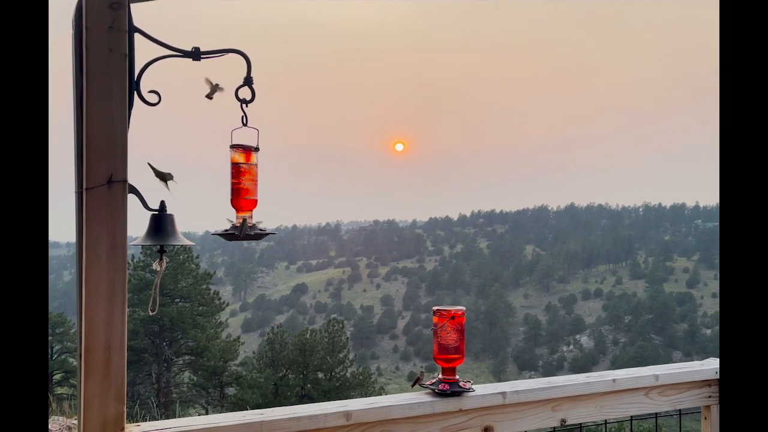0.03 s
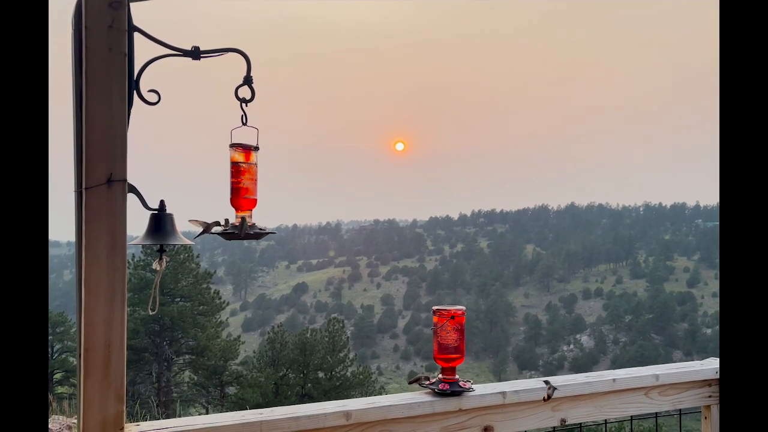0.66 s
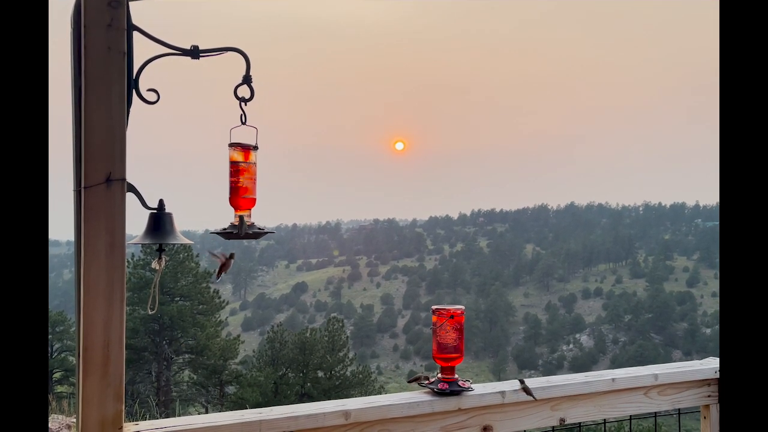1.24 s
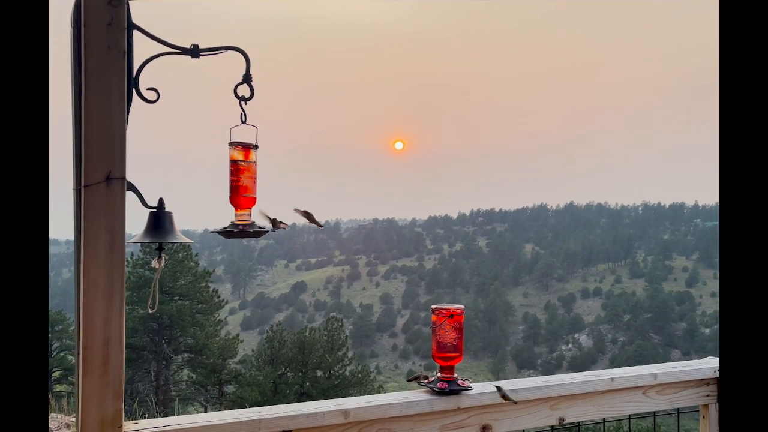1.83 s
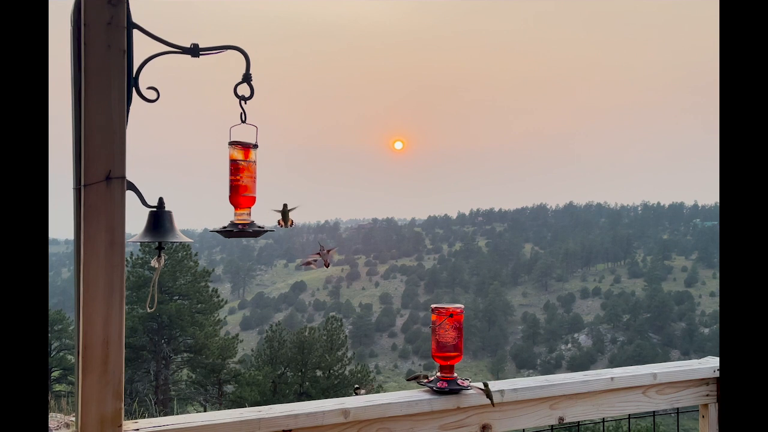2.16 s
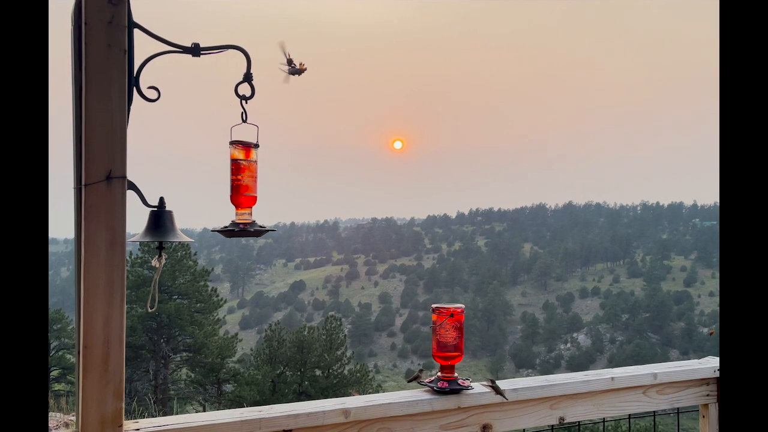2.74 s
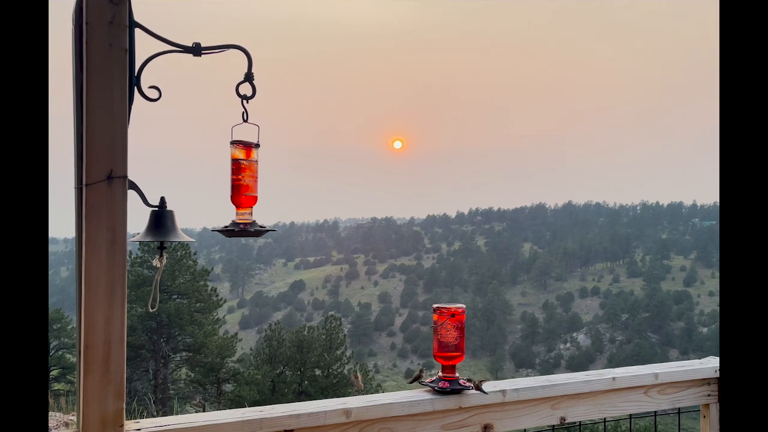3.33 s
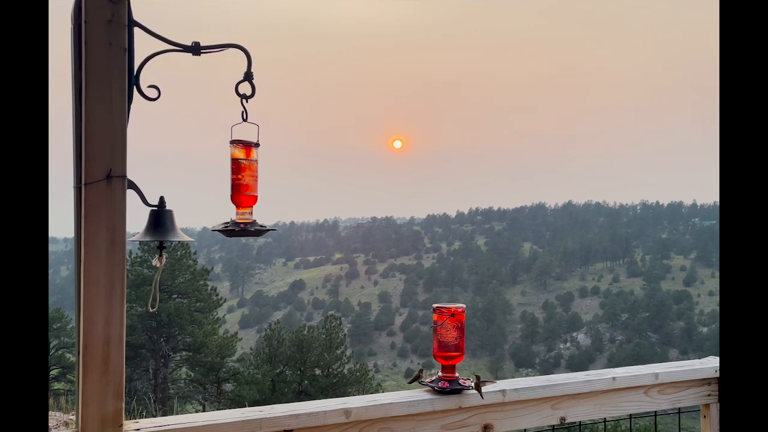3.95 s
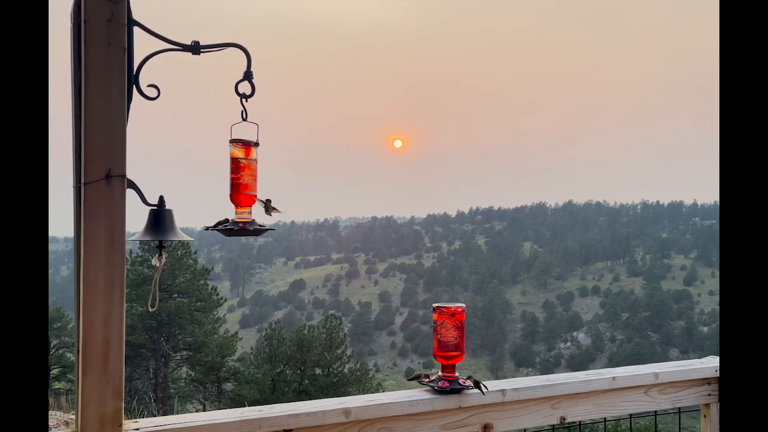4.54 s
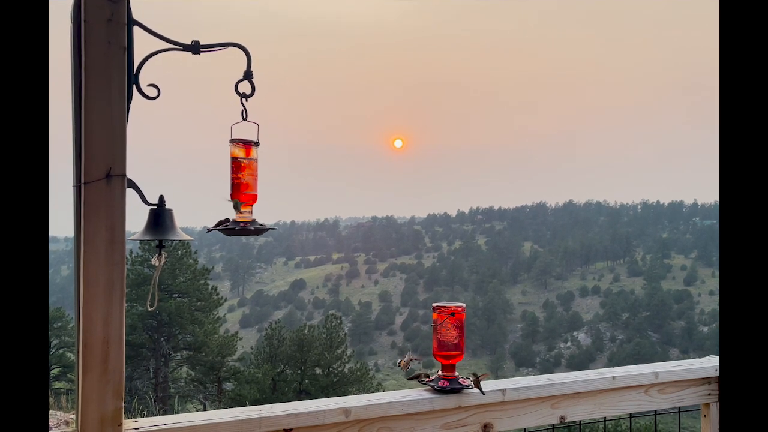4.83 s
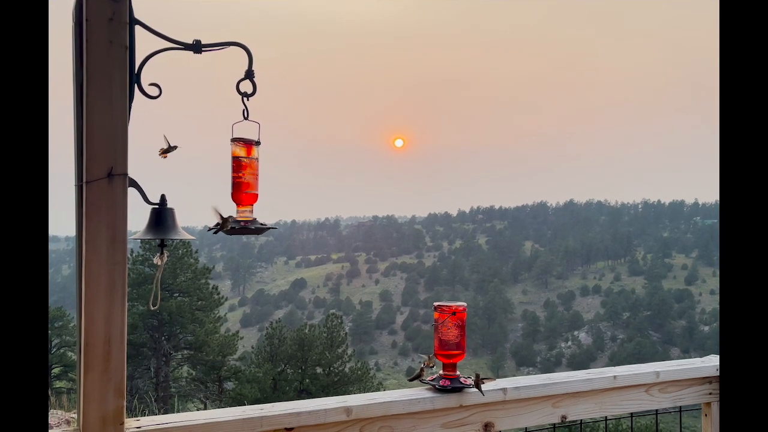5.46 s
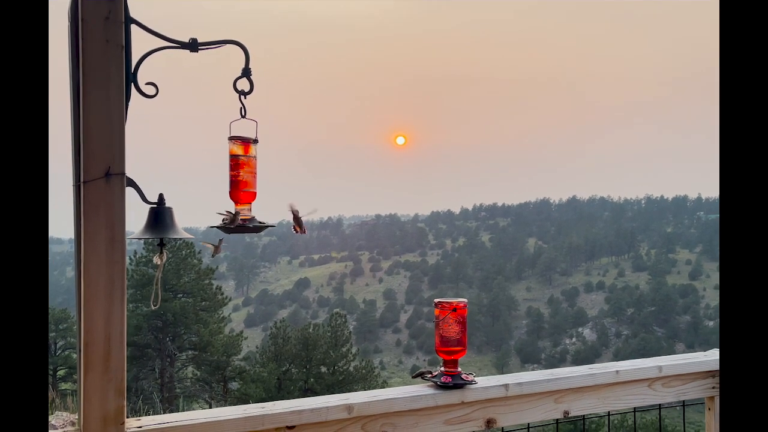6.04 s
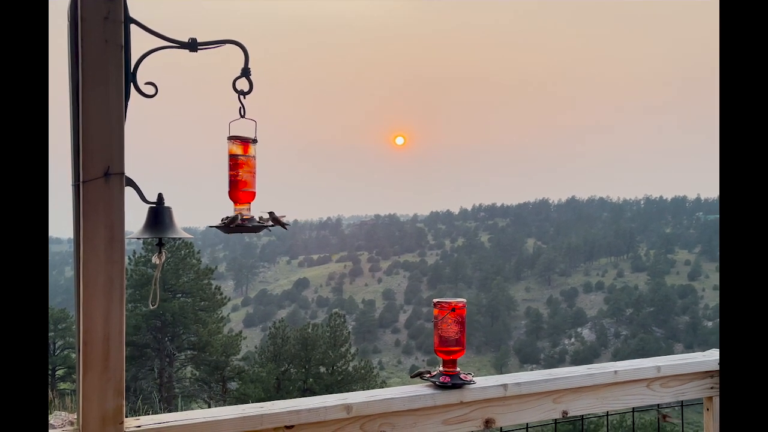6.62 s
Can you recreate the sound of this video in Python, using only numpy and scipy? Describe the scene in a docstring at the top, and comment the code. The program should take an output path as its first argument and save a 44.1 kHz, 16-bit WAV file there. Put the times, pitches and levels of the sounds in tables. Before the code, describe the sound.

Hummingbirds chip, tick and squeal outdoors, their wings humming and whirring past over a low steady rumble.

```python
"""Wings hum over a low rumble and a soft outdoor hiss: hummingbirds are squabbling round two feeders
on a wooden deck. Each wingbeat pushes the air, and now and then the outer feathers whistle. The birds'
syrinxes sweep out steep ticks, chips, one long trill, down-slurred squeals and rasps, among a few knocks.
The deck throws back short echoes; a small two-port microphone hears it all."""
import sys
import numpy as np
from scipy import signal
from scipy.fft import rfft, irfft, next_fast_len
from scipy.io import wavfile

SR = 44100
rng = np.random.default_rng(int(sys.argv[2]) if len(sys.argv) > 2 else 0)


def waveform_to_disk(signal):
    """Save audio, clipped to [-1, 1], as 16-bit WAV at the path in sys.argv[1]."""
    frames = np.transpose(np.atleast_2d(signal))
    scaled = np.clip(frames, -1, 1) * 32767
    samples = np.round(scaled).astype(np.int16)
    wavfile.write(sys.argv[1], SR, samples)


N = 295029
TIME = np.arange(N) / SR


def amp(db):
    return 10 ** (np.asarray(db) / 20)


def unit(x):
    return x / np.sqrt(np.mean(x ** 2) + 1e-20)


def at_hz(points, hz):
    """Interpolation on a log-frequency axis."""
    f, value = np.transpose(points)
    return np.interp(np.log(hz + 1), np.log(f + 1), value)


def at_time(rows):
    return np.interp(TIME, *np.transpose(rows))


def add(mix, start_s, sound):
    """Superposition: a sound sums into the stereo mix."""
    part = mix[:, max(round(start_s * SR), 0):][:, :sound.shape[1]]
    part += sound[:, :part.shape[1]]


def colour(x, points):
    """Filtering: each frequency is scaled by its own gain."""
    size = next_fast_len(x.shape[-1])
    gain = amp(at_hz(points, np.fft.rfftfreq(size, 1 / SR)))
    return irfft(rfft(x, size) * gain, size)[..., :x.shape[-1]]


def wander(rate_hz, size=N):
    """Low-pass noise: a smooth random fluctuation of unit size."""
    full = next_fast_len(size)
    f = np.fft.rfftfreq(full, 1 / SR)
    spectrum = rfft(rng.standard_normal(full)) * np.exp(-(f / rate_hz) ** 2) * (f > 0)
    return unit(irfft(spectrum, full))[:size]


def air(points, spread):
    """Partly coherent noise: spread scales the part that differs between the ports."""
    mid, side = colour(rng.standard_normal((2, N)), points)
    return unit(mid) + spread * unit(side) * np.array([[1], [-1]])


# Harmonics of a fast and a slow wingbeat. Each row: multiple of the beat rate, level in dB.
FAST_HARMONICS = [(1, -2), (2, -1), (3, -10.5), (4, -14.5), (5, -29), (6, -22.5)]
SLOW_HARMONICS = [(1, -9.5), (2, -0.5), (3, -15), (4, -9), (5, -22), (6, -28), (7, -21), (8, -19.5)]
FAST_BEAT_HZ, SLOW_BEAT_HZ = 80.8, 52.1
def wing_hum(beat_hz, harmonics, waver=0.01248, unsteady_db=2):
    """Periodic pushes on the air make a harmonic series; its partials swell and fade as the bird turns."""
    size = len(beat_hz)
    phase = 2 * np.pi * np.cumsum(beat_hz * (1 + waver * wander(12.18, size))) / SR
    return sum(amp(db + unsteady_db * wander(9.8, size)) * np.sin(k * phase + 2 * np.pi * rng.random())
               for k, db in harmonics)


# Air stirred by all the wings. Each row: time in seconds, level in dB.
STIR = [(0.03, -61), (1.6, -60.5), (1.81, -56), (2.25, -61), (2.46, -52), (2.66, -57.5), (3.29, -57.5),
        (3.61, -70), (3.68, -61.5), (4.15, -61.5), (4.26, -69.5), (5.02, -60), (5.56, -63), (5.69, -71.5),
        (6.26, -63), (6.69, -73)]
USUAL_STIR_DB = -60
def hovering(beat_hz, harmonics, level_db, follow, drift=.025, sway_db=2.0):
    """A stationary source: the hum of a bird at a feeder sways and grows with the bustle."""
    bustle_db = follow * (at_time(STIR) - USUAL_STIR_DB) + sway_db * wander(3.4)
    return amp(level_db + bustle_db) * wing_hum(beat_hz * (1 + drift * wander(1.49)), harmonics)


# Spectra of rumble, wing wash and hiss. Each row: frequency in Hz, relative density in dB.
RUMBLE = [(15, -52), (28, -24), (38, -10), (50, 9.5), (70, 1), (120, -7), (250, -10.5), (600, -43),
          (2000, -94)]
WASH = [(20, -28), (40, -9), (90, 9.5), (200, 6), (300, 2), (420, -0.5), (600, -7.5), (900, -18),
        (1600, -19), (3000, -29.5), (8000, -35), (11500, -67), (12600, -74)]
HISS = [(300, -10), (1000, 3.5), (2500, 1.5), (4500, -7), (6500, -1), (9000, 5), (11000, 9.5),
        (12100, -5.5), (12600, -34)]
# Swell of the hiss. Each row: time in seconds, level in dB.
HISS_LEVEL = [(0, -70), (1, -69), (1.7, -73), (2.08, -63), (2.75, -68.5), (3.3, -72.5), (4.6, -76.5),
              (5.6, -73.5), (6.05, -82.5), (6.69, -85)]
def air_noise(rumble_db=-59.0, rumble_follow=0.38, wash_db=-62.0, wash_follow=1.19):
    """Amplitude-modulated noise: rumble and the rush off the wings follow the stir, under a fine hiss."""
    stir_db = at_time(STIR) - USUAL_STIR_DB
    rumble = amp(rumble_db + rumble_follow * stir_db + 1.15 * wander(7.4)) * air(RUMBLE, spread=0.027)
    flicker_db = 1.76 * wander(90) + 2.47 * wander(5.9)
    wash = amp(wash_db + wash_follow * stir_db + flicker_db) * air(WASH, spread=0.41)
    hiss = amp(at_time(HISS_LEVEL) + 2.7 * wander(80)) * air(HISS, spread=0.36)
    return rumble + wash + hiss


# Birds darting past. Each row: time when nearest in seconds, time to close in in seconds,
# wingbeat rate in Hz, hum level in dB.
PASSES = [(0.051, 0.056, 43, -50), (0.3, 0.17, 84, -57), (0.719, 0.22, 82.4, -57), (1.14, 0.041, 85, -52.5),
          (1.799, 0.24, 87, -57), (1.84, 0.1, 56, -50), (2.2, 0.19, 75.6, -55), (2.35, 0.047, 48, -48),
          (2.55, 0.1, 50.4, -47), (2.79, 0.055, 50, -51.5), (3.12, .18, 51, -51.5), (4.031, .09, 79, -57.5),
          (4.26, 0.14, 44, -54.5), (4.979, 0.1, 75, -60), (5.55, 0.076, 77, -57.5), (6.27, 0.17, 52, -56)]
FLIGHT_M_PER_S, SOUND_M_PER_S = 2.948, 343
def passes():
    """Doppler effect: a passing hum drops in pitch, and its amplitude falls with distance squared."""
    out = np.zeros((2, N + SR))
    t = np.arange(2 * SR) / SR - 1
    for nearest_s, closing_s, beat_hz, level_db in PASSES:
        distance = np.hypot(1, t / closing_s)  # in units of the nearest distance
        doppler = 1 - FLIGHT_M_PER_S / SOUND_M_PER_S * t / closing_s / distance
        harmonics = FAST_HARMONICS if beat_hz > (FAST_BEAT_HZ + SLOW_BEAT_HZ) / 2 else SLOW_HARMONICS
        envelope = amp(level_db) / distance ** 2 * signal.windows.tukey(len(t), .5)
        add(out, nearest_s, envelope * wing_hum(beat_hz * doppler, harmonics)[None])
    return out[:, SR:]  # each pass begins a second before it is nearest


def with_echoes(sound, echo_db, early=0.25, spread_s=.014, tail=0.88, t60_s=0.12, port_lag_s=.00008):
    """Reflection: post, rail and boards add a few early echoes and a short diffuse tail."""
    t = np.arange(SR // 4) / SR
    delay, strength, side = rng.random((3, 7))
    taps = np.zeros((2, len(t)))
    for port, sign in enumerate((1, -1)):  # each echo arrives from its own side
        arrival_s = .002 + spread_s * delay + sign * port_lag_s * (side - .5)
        taps[port, (arrival_s * SR).astype(int)] = strength + .5
    envelope = amp(-60 * t / t60_s) * np.minimum(t / 0.0035, 1)
    shared, left, right = rng.standard_normal((3, len(t))) * envelope
    diffuse = shared + .5 * np.array([left, right])
    response = early * taps / np.linalg.norm(taps[0]) + tail * diffuse / np.linalg.norm(diffuse[0])
    heard = amp(echo_db) * signal.fftconvolve(sound[None], response, axes=1)
    heard[:, :len(sound)] += sound
    return heard


# Response of the throat. Each row: frequency in Hz, gain in dB.
THROAT = [(1500, -0.5), (2100, -4.5), (2700, -7), (3500, -6), (5000, -1), (7000, 5.5), (8500, 8),
          (11000, 12), (13000, -14)]
ATTACK_S, RELEASE_S = 0.00062, 0.00043
NEAR_CALL_DB, ECHO_DB_PER_DB = -54.5, 0.1928  # a fainter call is farther off and has more echo
def syrinx(rows, contour, echo_db, rough, scratch, shake_db=2.5, waver=0.012, flutter_hz=900,
           warble=0., warble_hz=98, settle=0., throb=0., throb_hz=95):
    """Source and filter: the syrinx sweeps a harmonic tone along a contour and the throat colours it."""
    out = np.zeros((2, N))
    share, contour_hz, contour_db = np.transpose(contour)
    for start_s, length, pitch, level_db, tilt_db in rows:
        t = np.arange(int(length * SR)) / SR
        progress = t / length
        flutter, drift, shake, grit = (wander(r, 12288)[:len(t)] for r in (flutter_hz, 200, 300, 1800))
        swing = np.tanh(-2 * np.cos(2 * np.pi * warble_hz * t)) * (1 - settle * progress)
        bend = np.exp(rough * flutter + waver * drift + warble * swing)
        hz = pitch * np.interp(progress, share, contour_hz) * bend
        phase = 2 * np.pi * np.cumsum(hz) / SR
        voice = sum(amp(at_hz(THROAT, k * hz) + tilt_db * np.log2(k)) * np.sin(k * phase)
                    * np.clip((SR / 3 - k * hz) / 2000, 0, 1) for k in range(1, 8))
        effort = amp(np.interp(progress, share, contour_db) + shake_db * shake)
        effort *= 1 + scratch * grit  # uneven cycles scratch
        pulsing = 1 - throb * np.cos(2 * np.pi * throb_hz * t)  # a negative throb starts on a crest
        edges = np.clip(np.minimum(t / ATTACK_S, (length - t) / RELEASE_S), 0, 1)
        call = unit(voice * effort * pulsing * edges)
        far_db = ECHO_DB_PER_DB * (NEAR_CALL_DB - level_db)
        add(out, start_s, amp(level_db) * with_echoes(call, echo_db + far_db))
    return out


# Contour of a tick. Each row: share of its length, pitch in Hz, level in dB.
TICK = [(0, 8450, -3), (.14, 7953, -3.5), (.24, 5600, 2.5), (0.451, 3758, 1.5), (1, 2428, -4.5)]
# The ticks. Each row: start in seconds, length in seconds, pitch factor, level in dB,
# overtone tilt in dB per octave.
TICKS = [(0.104, 0.032, 1.09, -57, -13.5), (0.164, 0.019, 0.85, -61, -10.5), (0.232, 0.017, 0.9, -60, -10),
         (0.494, 0.029, 0.85, -61.5, -11), (0.681, 0.016, 0.94, -67.5, -14),
         (1.471, 0.023, 0.59, -65.5, -4.5), (1.502, 0.017, 1.05, -55.5, -11.5),
         (1.913, 0.015, 0.91, -56.5, -3.5), (2.138, 0.012, 1.2, -63, -10),
         (2.606, 0.038, 0.92, -53.5, -7.5), (3.017, 0.013, 0.77, -62, -11.5),
         (3.212, 0.02, 0.98, -62.5, -6), (3.416, 0.026, 1.09, -65, -9), (3.52, 0.016, 1.08, -56, -7),
         (3.831, 0.033, 0.92, -57.5, -8), (4.048, 0.019, 1, -57, -16), (4.377, 0.018, 0.77, -54.5, 0),
         (5.391, 0.022, 0.9, -59, -7.5), (5.535, 0.029, 1.03, -54.5, -9), (6.192, 0.019, 0.82, -60, -8),
         (6.317, 0.027, 0.83, -64.5, -10), (6.523, 0.029, 1.08, -58, -17), (6.665, 0.02, 0.9, -58.5, -11)]
def ticks():
    """A frequency sweep this steep and brief is heard as a tick."""
    return syrinx(TICKS, TICK, echo_db=-3, rough=.026, waver=.03, shake_db=3, scratch=.4)


# Chip contour and calls, with columns as for the ticks.
CHIP = [(0, 6200, -4), (.2, 5300, 2), (.5, 4500, .5), (.8, 3800, -4), (1, 2700, -13)]
CHIPS = [(0.448, 0.019, 0.98, -45, -5), (0.879, 0.022, 0.97, -45, -5), (1.342, 0.02, 0.97, -44, -5.5),
         (1.779, 0.027, 0.92, -46.5, -4), (2.005, 0.033, 0.96, -43.5, -1.5),
         (2.075, 0.017, 0.64, -50.5, -4), (2.259, 0.022, 0.93, -46.5, -5), (3.164, 0.019, 1, -45, -7.5),
         (3.639, 0.019, 0.97, -50.5, -7.5), (3.743, 0.02, 0.97, -63.5, -10.5),
         (3.821, 0.019, 0.95, -56, -2), (3.994, 0.028, 0.93, -49, -6), (4.149, 0.019, .86, -48.5, -2.5),
         (4.235, 0.022, 1.02, -55.5, -11), (4.538, 0.014, 0.9, -53.5, -9), (4.725, 0.022, 1.006, -50.5, 0),
         (5.248, 0.026, 0.96, -51.5, -12.5), (5.679, 0.029, 0.94, -53.5, -10),
         (5.767, 0.022, 0.91, -49.5, -7), (6.42, 0.038, 0.96, -61.5, -7.5)]
def chips():
    """A falling sweep with little jitter sounds clean."""
    return syrinx(CHIPS, CHIP, echo_db=-3.5, rough=.011, waver=.015, scratch=.16)


# Spectrum of a knock. Each row: frequency in Hz, relative density in dB.
KNOCK = [(100, 20.5), (400, 0), (900, -11), (2000, -8.5), (6000, -8), (12000, -8)]
# The knocks. Each row: start in seconds, level in dB.
KNOCKS = [(0.847, -47), (2.427, -41), (4.539, -48)]
def knocks(decay_s=0.0063):
    """Heavily damped impacts, as of birds bumping a feeder, die without ringing."""
    out = np.zeros((2, N))
    t = np.arange(2048) / SR
    for start_s, level_db in KNOCKS:
        burst = unit(colour(rng.standard_normal(len(t)), KNOCK)) * np.exp(-t / decay_s)
        add(out, start_s, amp(level_db) * burst[None])
    return out


# Sagging contour and scolding calls, with columns as for the ticks.
SAG = [(0, 2500, 0), (.4, 2200, -2), (1, 2050, -8)]
SCOLDS = [(.905, 0.1, 0.9, -67, -11), (2.93, 0.075, 1.11, -62.5, -8), (3.54, .09, 1.1, -66.5, -6.5),
          (5.975, 0.06, 1.24, -72.5, -8)]
def scolds():
    """Deep random frequency modulation smears a tone into hoarse noise."""
    return syrinx(SCOLDS, SAG, echo_db=-1.5, rough=.22, scratch=.6, shake_db=3, flutter_hz=2000)


# Whistle contour and calls, with columns as for the ticks.
WHISTLE = [(0, 7300, 0), (.45, 6600, 4), (.8, 5640, 1), (1, 4700, -2.5)]
WHISTLES = [(1.259, 0.05, 0.97, -69.5, -25), (1.367, 0.032, 0.84, -69, -26.5),
            (2.28, 0.014, 0.95, -54.5, -11)]
def whistles():
    """Regular vibration with weak overtones gives a nearly pure falling tone."""
    return syrinx(WHISTLES, WHISTLE, echo_db=-1, rough=0.0013, waver=0.0058, scratch=.1)


# Trill contour and call, with columns as for the ticks.
TRILL = [(0, 7000, -9), (.12, 7400, 2), (.3, 7250, 3), (.5, 7050, 2), (.75, 6750, -1), (.93, 6550, -6),
         (1, 5700, -13)]
TRILLS = [(1.69, 0.228, 0.94, -47.5, -0.46)]
def trill():
    """Frequency and amplitude modulation in step; the pitch swing narrows as the call goes on."""
    return syrinx(TRILLS, TRILL, echo_db=0, rough=.018, scratch=.1,
                  warble=.19, warble_hz=98, settle=.35, throb=.45, throb_hz=98)


# Whistling feathers. Each row: start in seconds, length in seconds, pitch at the stroke's crest in Hz,
# wingbeat rate in Hz, level in dB.
WING_TRILLS = [(1.928, 0.22, 10750, 70, -57), (3.432, 0.3, 9700, 68, -72), (5.642, 0.21, 6280, 48, -67.5),
               (5.865, 0.15, 6050, 52, -79.5), (6.279, 0.34, 6100, 43, -81)]
def wing_trills(sharpness=3.4, bend=0.028, uneven_db=3, echo_db=-4):
    """Flow-induced tone: the outer feathers whistle once on every stroke as a bird flies by."""
    out = np.zeros((2, N))
    for start_s, length, hz, beat_hz, level_db in WING_TRILLS:
        t = np.arange(int(length * SR)) / SR
        stroke = np.sin(2 * np.pi * beat_hz * t)
        pitch = hz * (1 + bend * (stroke - 1) + .016 * wander(700, 32768)[:len(t)])
        force = np.exp(sharpness * stroke) * amp(uneven_db * wander(35, 32768)[:len(t)])
        tone = np.sin(2 * np.pi * np.cumsum(pitch) / SR)
        pips = unit(force * tone * signal.windows.tukey(len(t), .1))
        add(out, start_s, amp(level_db) * with_echoes(pips, echo_db))
    return out


# Arch contour and call, with columns as for the ticks.
ARCH = [(0, 3880, -8), (.2, 3320, -1), (.5, 4250, 1.5), (.75, 3700, -3), (1, 2220, 0)]
ARCHES = [(2.154, 0.0402, 0.99, -49, -4.5)]
def arch():
    """A glide that reverses: the pitch dips, crests and falls."""
    return syrinx(ARCHES, ARCH, echo_db=-5, rough=0.023, shake_db=3.0, scratch=0.19)


# Contours and calls of squeals and softer slurs, with columns as for the ticks.
SQUEAL = [(0, 4800, 1), (.09, 3200, 3), (.2, 2250, -1), (.45, 1980, -3), (1, 1700, -9)]
SQUEALS = [(2.335, 0.074, 1.01, -46.5, -3), (2.709, 0.068, 1.01, -47, -3.5), (4.235, 0.025, 1.3, -51.5, -3)]
SLUR = [(0, 3600, 1), (.17, 2800, 3), (.42, 2280, 0), (.75, 2060, -1.5), (1, 1950, -4.5)]
SLURS = [(2.482, 0.079, 0.83, -59.5, -7.5), (2.855, 0.047, 0.8, -58.5, -5.5),
         (4.031, 0.04, 1.01, -53.5, -4), (4.379, 0.031, 0.93, -61, -6.5), (4.479, 0.047, .94, -55.5, -4.5),
         (4.576, 0.046, 0.97, -54, -3.5), (5.036, 0.033, 1.01, -51, -3)]
def squeals():
    """Downward glides level off, throbbing with shallow amplitude modulation."""
    voice = dict(echo_db=-5, waver=.035, scratch=.3, throb=-.22, throb_hz=65)
    return (syrinx(SQUEALS, SQUEAL, rough=.022, shake_db=3.2, **voice)
            + syrinx(SLURS, SLUR, rough=.02, shake_db=3.3, **voice))


# Stuttering calls, with columns as for the ticks.
STUTTERS = [(2.624, 0.039, 0.89, -47.5, -0.5), (3.929, 0.05, 1, -63.5, -7), (4.819, .034, 0.94, -53, -1.5)]
def stutters():
    """Deep amplitude modulation chops a sagging tone into pulses."""
    return syrinx(STUTTERS, SAG, echo_db=-5.5, rough=0.059, scratch=0.2,
                  warble=0.026, throb=0.77, throb_hz=96.6)


# Rasp contour and calls, with columns as for the ticks.
RASP = [(0, 2153, -8), (.2, 2730, -0.5), (.45, 4610, -1), (.7, 5900, 1.5), (1, 6060, -6)]
RASPS = [(4.323, .058, 1.2, -51.5, -0.3), (4.905, .071, 1, -48, 0.14)]
def rasps():
    """Fast frequency modulation spreads harsh sidebands round a rising tone."""
    return syrinx(RASPS, RASP, echo_db=-0.5, rough=0.056, scratch=0.12, flutter_hz=1500,
                  warble=0.113, warble_hz=479)


def scene():
    """Superposition of wings, outdoor air, knocks and calls."""
    fast = hovering(FAST_BEAT_HZ, FAST_HARMONICS, level_db=-63.5, follow=0.95)
    slow = hovering(SLOW_BEAT_HZ, SLOW_HARMONICS, level_db=-61.5, follow=0.57)
    return (fast + slow + air_noise() + passes() + ticks() + chips() + knocks() + scolds() + whistles()
            + trill() + wing_trills() + arch() + squeals() + stutters() + rasps())


# Phase between the ports. Each row: frequency in Hz, lead of the left in radians.
PORT_PHASE = [(200, 0), (2000, -.3), (5000, -.55), (6500, -.35), (7600, -1.6), (8700, .2), (9300, 1.7),
              (10400, 3.14), (11600, 4.9), (13000, 5.6)]
# Balance of the ports. Each row: frequency in Hz, left minus right in dB.
PORT_BALANCE = [(60, -1), (300, -0.7), (700, -3), (1300, -3.5), (2500, -4), (5000, -3.5), (9000, -1),
                (12000, 0.5)]
# Overall gain, with one brief dip. Each row: time in seconds, gain in dB.
GAIN = [(5.826, 5), (5.838, -52), (5.853, -35), (5.86, 4.5)]
CUTOFF_HZ = 13000
def record(dry):
    """Phase and level differences between the ports give width; the level dips once; highs are cut."""
    size = next_fast_len(N + 4096)
    hz = np.fft.rfftfreq(size, 1 / SR)
    left = amp(at_hz(PORT_BALANCE, hz) / 2) * np.exp(.5j * at_hz(PORT_PHASE, hz))
    heard = irfft(rfft(dry, size) * np.array([left, 1 / left]), size)[:, :N] * amp(at_time(GAIN))
    lowpass = signal.firwin(127, CUTOFF_HZ, window=("kaiser", 8), fs=SR)
    return signal.oaconvolve(heard, lowpass[None], "same", axes=1)


dry = scene()
out = record(dry)
waveform_to_disk(out)
```